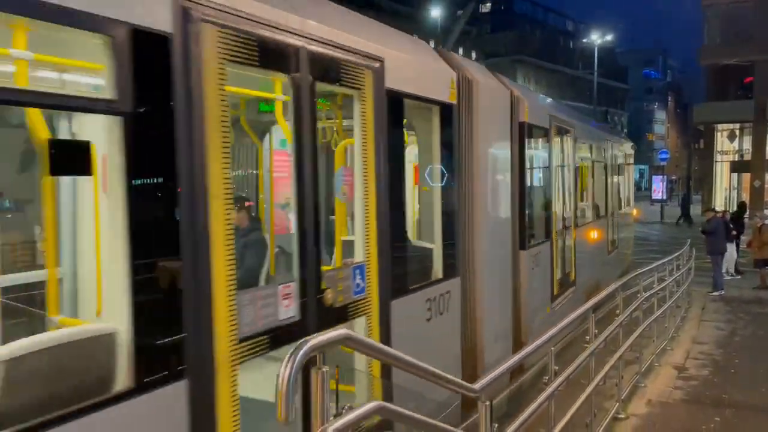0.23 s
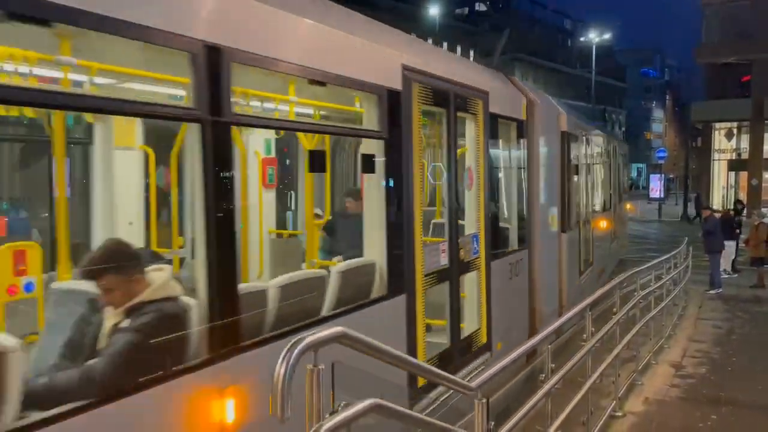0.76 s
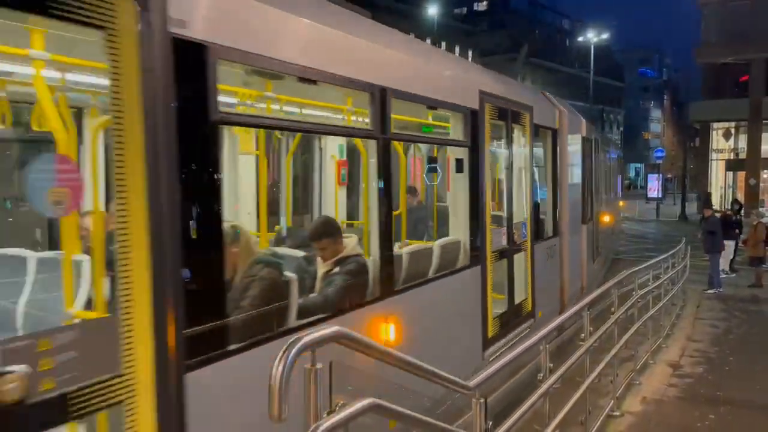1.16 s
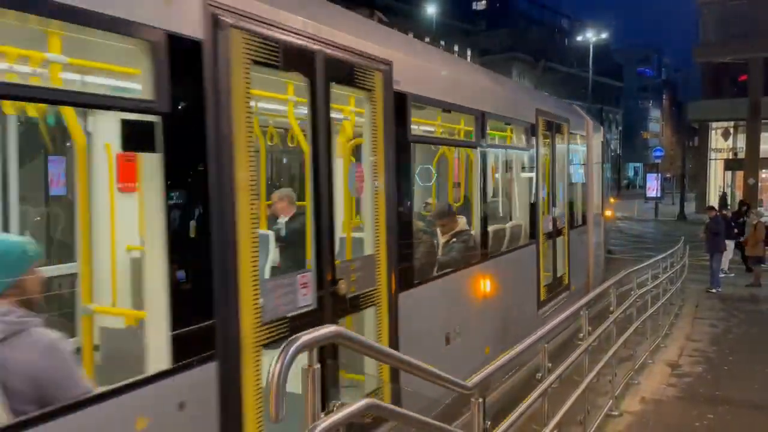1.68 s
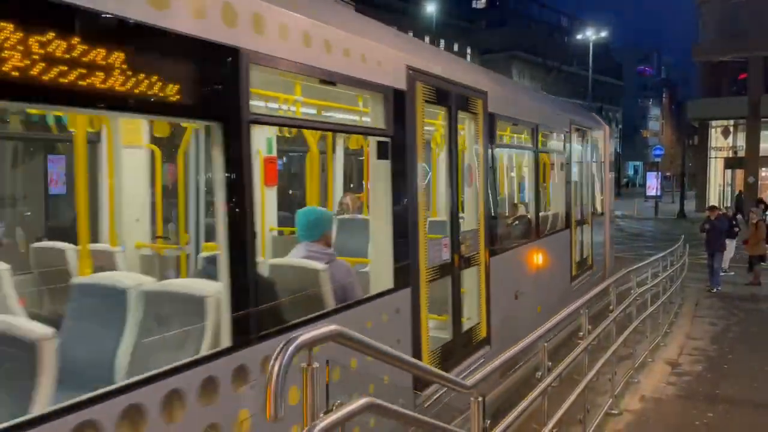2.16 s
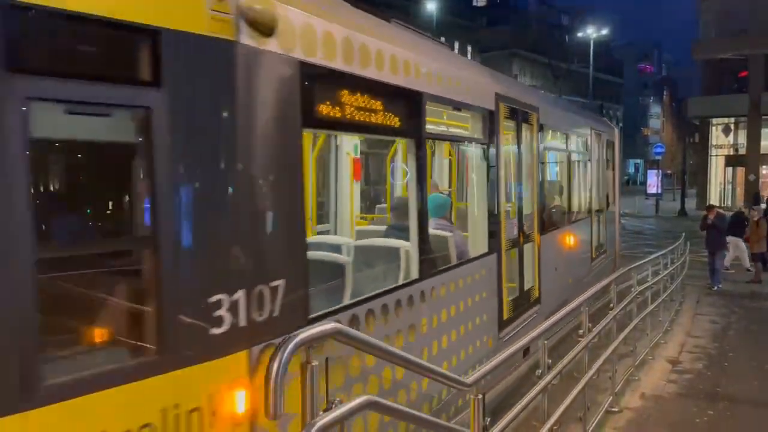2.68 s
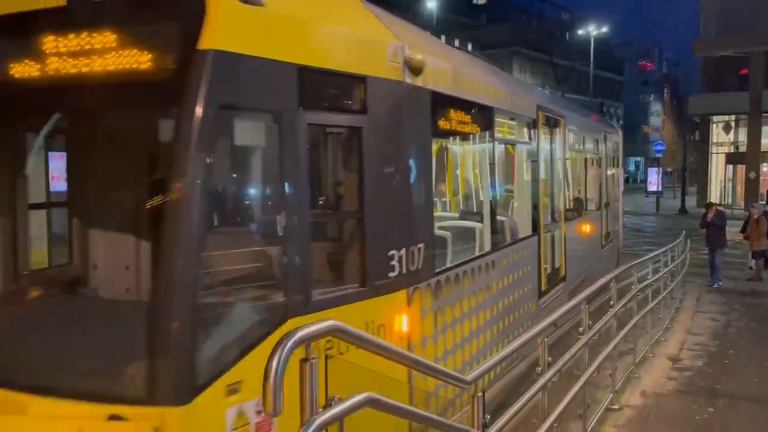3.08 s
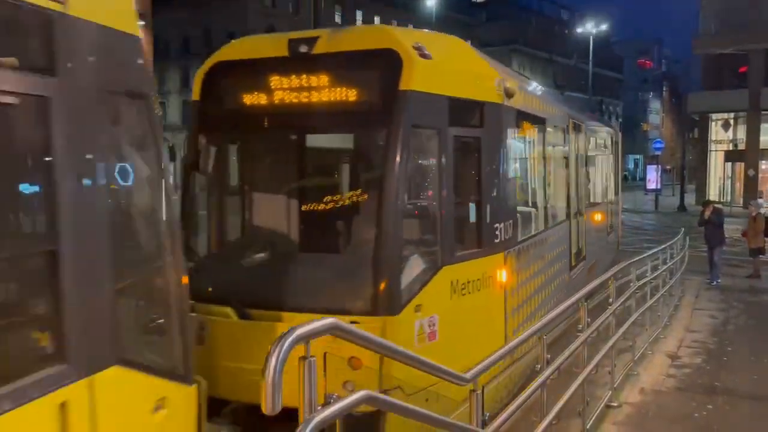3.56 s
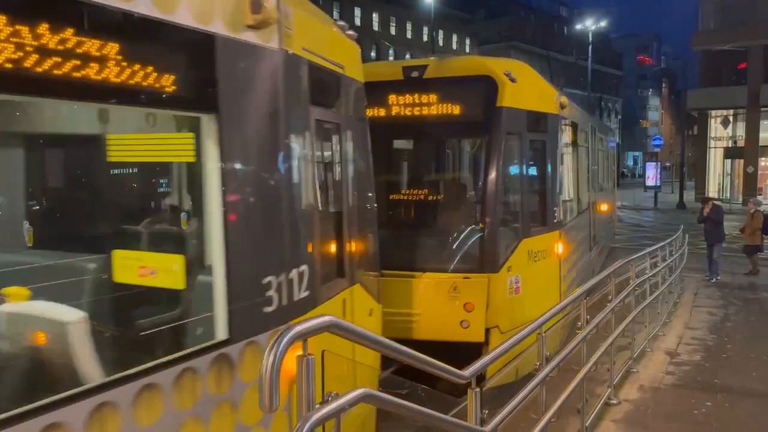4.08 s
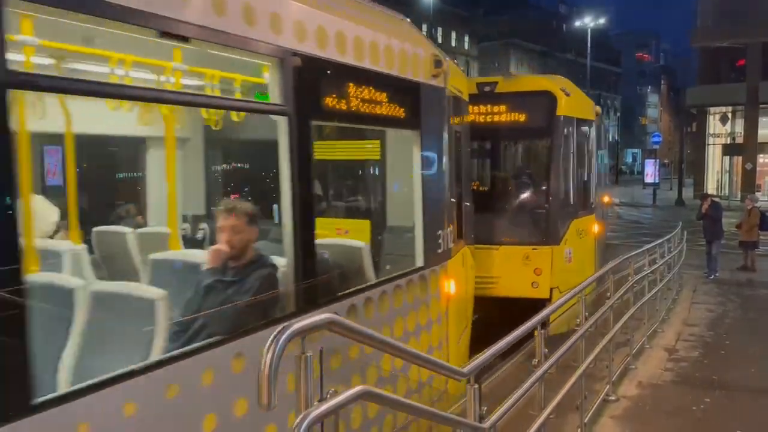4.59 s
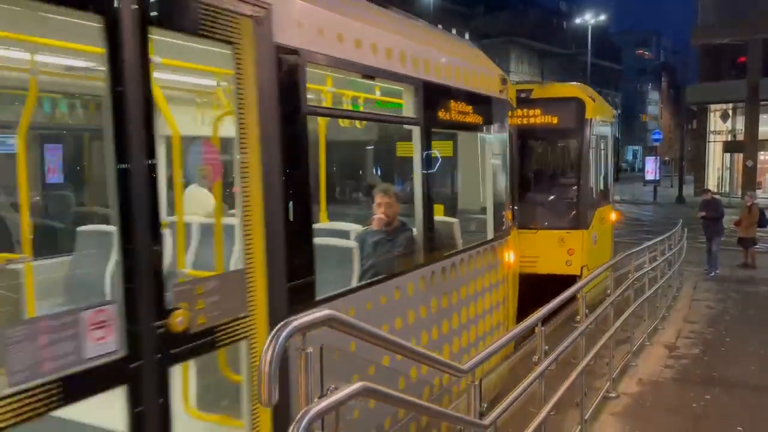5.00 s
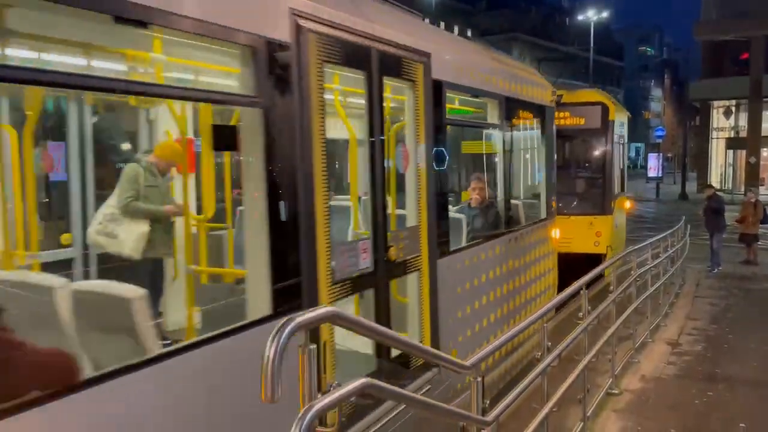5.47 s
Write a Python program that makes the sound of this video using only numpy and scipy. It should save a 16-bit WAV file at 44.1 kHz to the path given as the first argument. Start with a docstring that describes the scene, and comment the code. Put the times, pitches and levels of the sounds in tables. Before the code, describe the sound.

Coupled trams glide by at arm's length with a deep throbbing boom and rolling roar, then rattle, grind and squeak as the second car passes.

```python
"""Two trams gliding past

Two coupled trams glide past at a city stop, an arm's length away. The bodies boom near 70 Hz, a beating
low mode, over filtered-noise roar of wheels on rail. The rail sings in wavering modes and low hums come
and go. Rattles and thin flange whistles set in midway; then the second car's bogie arrives, and small
contacts make its steel grind. Short groans, squeaks and rasps come from the wheels."""
import sys
import numpy as np
from scipy import signal
from scipy.fft import rfft, irfft
from scipy.io import wavfile
from scipy.ndimage import map_coordinates

SR = 44100
rng = np.random.default_rng(int(sys.argv[2]) if len(sys.argv) > 2 else 0)


def to_wav(sig):
    """Store sig (one row per channel, or 1-D mono) as 16-bit WAV at the path in sys.argv[1].

    Samples outside -1..1 are clipped; the rate is SR.
    """
    pcm = np.clip(np.atleast_2d(sig), -1, 1) * 32767
    pcm = np.round(pcm).astype(np.int16)
    wavfile.write(sys.argv[1], SR, pcm.T)  # frames by channels


N = 253134
T = np.arange(N) / SR
FREQS = np.maximum(np.fft.rfftfreq(N, 1 / SR), 1)


def undb(db):
    """Decibels to gain."""
    return 10 ** (np.asarray(db) / 20)


def unit(x):
    """Scale to rms 1."""
    return x / np.sqrt(np.mean(x ** 2))


def curves(table):
    """Draw each column of a table as a line through time."""
    start_s, *columns = np.transpose(table)
    return [np.interp(T, start_s, column) for column in columns]


def during(table, fade_s=0.12):
    """1 while a table lasts, fading outside it."""
    inside_s = np.minimum(T - table[0][0], table[-1][0] - T)
    return np.clip(1 + inside_s / fade_s, 0, 1)


def swell(start, length):
    """A rounded rise to 1 and fall."""
    along = np.clip((T - start) / length, 0, 1)
    return 2 * np.sqrt(along * (1 - along))


def held(start, length, attack_s, release_s):
    """Attack, hold and an exponential release."""
    attack = np.clip((T - start) / attack_s, 0, 1)
    return attack * np.exp(-np.maximum(T - start - length, 0) / release_s)


def noise():
    """Unrelated white noise for mid and side."""
    return rng.standard_normal((2, N))


def response(points):
    """Gain at every frequency from (Hz, dB) points, joined on a log frequency axis."""
    hz, db = np.transpose(points)
    return undb(np.interp(np.log(FREQS), np.log(hz), db))


def resonance(hz, width_hz):
    """Band-pass response with gain 1 at the centre."""
    return 1 / (1 + 1j * (FREQS ** 2 - hz ** 2) / (FREQS * width_hz))


def filtered(x, gain):
    """Pass a sound through a frequency response."""
    return irfft(rfft(x) * gain, N)


def walk(rate):
    """Slow random wander with rms 1: 2 * rate random levels a second, joined smoothly."""
    levels = rng.standard_normal(2048)
    return unit(map_coordinates(levels, [T * rate * 2], order=2, mode="wrap"))


def tone(hz):
    """A clean partial on a moving pitch, a quarter cycle apart in mid and side."""
    phase = 2 * np.pi * np.cumsum(hz) / SR
    return np.sqrt(2) * np.array([np.sin(phase), np.cos(phase)])


def ring(hz, width_hz):
    """A mode kept ringing by friction: size and phase wander faster the wider it is; pitch may move."""
    steps = rng.standard_normal((4, 32768))
    place = [T * width_hz * 2]
    swing = np.array([map_coordinates(row, place, order=2, mode="wrap") for row in steps])
    phase = 2 * np.pi * np.cumsum(hz + 0 * T) / SR
    return unit(swing[:2] * np.cos(phase) + swing[2:] * np.sin(phase))


def drifting(x, share, rate):
    """Let the pitch of a sound wander by a small share, by playing it slightly early or late."""
    place = (T + share * walk(rate) / (np.pi * rate)) * SR
    return np.array([map_coordinates(row, [place], order=3, mode="mirror") for row in x])


# the body's boom, swelling as each car goes by, before lulls and thuds: start_s, level_db
BOOM_LEVEL = [(0, -16), (1.04, -18), (1.09, -13.5), (1.5, -10.5), (2.12, -10.5), (2.3, -12.5),
              (2.95, -11.5), (3.15, -20), (3.95, -15), (4.25, -10.5), (4.55, -11), (4.78, -15.5),
              (4.83, -23), (5.25, -20.5), (5.5, -15.5)]
# pitch of the boom: start_s, pitch_hz
BOOM_PITCH = [(0, 66.97), (0.95, 72.03), (1.5, 66.44), (2.8, 68.47), (4.4, 73.67), (5.74, 70.42)]
# moments when the boom dips: start_s, length_s
LULLS = [(0.119, 0.15), (0.482, 0.036), (0.835, 0.037), (1.688, 0.04), (2.153, 0.11), (2.469, 0.03),
         (3.572, 0.11), (3.875, 0.038), (4.15, 0.03), (4.944, 0.041), (5.252, 0.06)]
LULL_DB = -14
# thuds that kick the body into a wider swing: start_s, lift_db
THUDS = [(0.3, 2.5), (0.63, 5.5), (1.07, 4.5), (3.18, 10.5), (3.418, 8.5), (3.68, 6.5), (4.26, 3.5),
         (4.76, 8)]
THUD_RISE_S, THUD_DECAY_S = 0.015, 0.088


def boom(wander_hz=1.84, beat=0.26, beat_per_s=12, tone_db=-0.1, overtone_db=-22,
         shake_db=-12, shake_hz=65, shake_width_hz=32):
    """The body's low mode swings with a weak octave, beating unevenly as the track shakes it."""
    db = curves(BOOM_LEVEL)[0]
    for start, length in LULLS:
        db = db + LULL_DB * swell(start, length) ** 2
    for start, lift in THUDS:
        db = db + lift * held(start, THUD_RISE_S, THUD_RISE_S, THUD_DECAY_S)
    hz = curves(BOOM_PITCH)[0]
    phase = 2 * np.pi * np.cumsum(hz + wander_hz * walk(14.6)) / SR
    # a random push on the steady swing moves both its size and its phase
    pushed = 1 + beat * (walk(beat_per_s) + 1j * walk(beat_per_s))
    size = unit(np.abs(pushed))
    phase = phase + np.angle(pushed)
    swing = np.array([np.sin(phase), 0.39 * np.cos(phase)]) * size * undb(tone_db)
    octave = undb(overtone_db) * ring(2 * hz, 13.8)
    shake = undb(shake_db) * unit(filtered(noise(), resonance(shake_hz, shake_width_hz) ** 2))
    return undb(db) * (swing + octave + shake)


# spectrum of the rumble under the floor: frequency_hz, density_db (relative, per Hz)
RUMBLE_SPECTRUM = [(20, -37), (32, -43), (45, 0), (100, 2), (122, -3), (142, -15), (165, -11), (195, -7),
                   (300, -16), (420, -24.5), (900, -49)]
# spectrum of the track's roar: frequency_hz, density_db (relative, per Hz)
ROAR_SPECTRUM = [(200, 1.5), (380, 0.5), (470, 2), (620, 1), (710, 3), (830, 3.5), (1000, -3.5),
                 (1170, -10), (1600, -9), (1950, -17.5), (3000, -24), (6000, -38)]
# spectrum of the fine rolling hiss: frequency_hz, density_db (relative, per Hz)
HISS_SPECTRUM = [(900, 4), (2000, 7), (3200, 5.5), (4200, 0), (6500, -5), (8200, -2.5), (10000, -9),
                 (12000, -8.5), (13500, -43), (16000, -28)]
# rough patches of track, lifting rumble in full and roar and hiss in part: start_s, length_s, lift_db
PATCHES = [(0.084, 0.21, 2), (1.23, 0.39, 4), (1.61, 0.13, 3.5), (1.82, 0.23, 4), (2.35, 0.13, 2.5),
           (2.78, 0.28, 3.5), (4.202, 0.14, 2), (4.446, 0.56, 2), (5.174, 0.11, 1.5), (5.4, 0.097, 2),
           (5.666, 0.22, 4.5)]
# base levels under the first car, and their growth as the second draws near
RUMBLE_DB, ROAR_DB = -26.5, -34.5
SECOND_CAR_S, RUMBLE_RISE_DB_PER_S, ROAR_RISE_DB_PER_S = 3.43, 2, 1.38
# the gap between the cars: no bogie is near, and the track's roar comes through
GAP_S, GAP_LENGTH_S, GAP_RUMBLE_DB, GAP_ROAR_DB = 2.98, 0.75, -1, 2


def rolling(roar_share=0.65, hiss_db=-43, hiss_share=0.23, uneven_db=1.37, hiss_uneven_db=0.95):
    """Wheel and rail roughness: rumble under the floor, roar from the track, a fine hiss on top."""
    lift = sum(db * swell(start, length) ** 2 for start, length, db in PATCHES)
    nearing_s = np.maximum(T - SECOND_CAR_S, 0)
    gap = swell(GAP_S, GAP_LENGTH_S)
    rumble_db = RUMBLE_DB + RUMBLE_RISE_DB_PER_S * nearing_s + GAP_RUMBLE_DB * gap + lift
    roar_db = ROAR_DB + ROAR_RISE_DB_PER_S * nearing_s + GAP_ROAR_DB * gap + roar_share * lift
    roar_db = roar_db + uneven_db * walk(18)
    hiss_level_db = hiss_db + hiss_share * lift + hiss_uneven_db * walk(8.6)
    rumble = unit(filtered(noise(), response(RUMBLE_SPECTRUM))) * undb(rumble_db)
    roar = unit(filtered(noise(), response(ROAR_SPECTRUM))) * undb(roar_db)
    hiss = unit(filtered(noise(), response(HISS_SPECTRUM))) * undb(hiss_level_db)
    return rumble + roar + hiss


# modes of the bogie's steel: frequency_hz, width_hz, relative_db
BOGIE_MODES = [(1308, 43, 2.5), (1478, 15, 9), (1860, 18, 9.5), (2205, 370, 4.5), (2860, 160, 3),
               (3120, 42, 7), (3400, 66, -1), (3640, 42, 8.5), (3830, 33, 4.5), (3890, 45, -1),
               (4480, 40, 7), (4590, 46, 8.5), (4820, 50, 0), (5055, 37, 5), (5260, 54, -4),
               (5970, 90, -1.5), (6220, 73, -4.5), (6350, 77, -0.5), (6940, 70, -3)]
# broad spectrum of the steel under those modes: frequency_hz, relative_db
STEEL_SPECTRUM = [(600, -7), (1500, -24), (2100, -2), (2550, -16), (3400, -2.5), (4200, -2.5), (5000, -3.5),
                  (5500, -7), (7000, -14), (8600, -2.5), (10000, -18), (13000, -13), (16000, -24)]
# jolts that set loose parts chattering: start_s, peak_db (before the jolt trim)
JOLTS = [(2.5644, -28.5), (3.4637, -26), (3.7638, -30), (4.0027, -27.5), (4.2818, -40), (4.417, -36),
         (4.4641, -33), (4.6006, -24.5), (4.6589, -30), (4.69, -32), (4.7747, -24.5), (4.8744, -41),
         (5.1942, -29), (5.3783, -31), (5.497, -29), (5.5639, -34)]
# harder scrapes of the near bogie: start_s, length_s, level_db (at the start, before the grind trim)
SCRAPES = [(4.28, 0.025, -39), (4.41, 0.15, -35.5), (4.436, 0.05, -48), (4.596, 0.087, -35),
           (4.685, 0.055, -38), (4.782, 0.13, -36), (4.915, 0.04, -45), (5.093, 0.02, -46),
           (5.176, 0.026, -45), (5.258, 0.032, -45), (5.304, 0.18, -39), (5.477, 0.15, -37),
           (5.677, 0.1, -40.5)]
SCRAPE_ATTACK_S, SCRAPE_RELEASE_S, SCRAPE_SAG_DB_PER_S = 0.021, 0.037, 32
# the near bogie grinds lightly from its arrival on; level before trim
BOGIE_ARRIVES_S, GRIND_DB = 4.19, -41.5
# how the modes come and go: spread of level, rate, and drift as a share of pitch
FLARE_DB, FLARES_PER_S, MODE_DRIFT = 2.5, 7, 0.004


def bogie(grind_trim_db=-1, bite_db=0.56, jolt_trim_db=-13, jolt_decay_s=0.029, contacts_per_s=2200,
          scatter_db=1.5, modes_db=-2, clatter_per_s=36, clatter_decay_s=0.02, clatter=0.62):
    """Dense small contacts ring the steel; scrapes bite and ease, loose parts clatter, jolts burst in."""
    # slaps come at a wandering rate; each has its own strength, starts sharply and fades until the next
    slap_rate = clatter_per_s * undb(3 * walk(30))
    slap_number, slap_progress = np.divmod(np.cumsum(slap_rate) / SR, 1)
    strength = 2 * rng.random(N)[slap_number.astype(int)]
    slaps = strength * np.exp(-slap_progress / clatter_per_s / clatter_decay_s)

    grind = undb(GRIND_DB) * np.clip((T - BOGIE_ARRIVES_S) / SCRAPE_ATTACK_S, 0, 1)
    for start, length, db in SCRAPES:
        sagging_db = db - SCRAPE_SAG_DB_PER_S * np.maximum(T - start, 0)
        grind = grind + undb(sagging_db) * held(start, length, SCRAPE_ATTACK_S, SCRAPE_RELEASE_S)
    force = grind * undb(grind_trim_db + bite_db * walk(13)) * (0.63 + clatter * slaps)
    for start, db in JOLTS:
        burst = (T >= start) * np.exp(-np.abs(T - start) / jolt_decay_s)
        force = force + undb(db + jolt_trim_db) * burst

    sizes = undb(scatter_db * np.minimum(rng.exponential(size=N), 4))
    touching = rng.random(N) < contacts_per_s / SR
    contacts = force * unit(noise() * sizes * touching)
    # the point of contact shifts, so the modes flare one by one and drift in pitch
    scrape = rfft(force * noise())
    modes = [undb(modes_db + db) * resonance(hz, width) for hz, width, db in BOGIE_MODES]
    ringing = sum(irfft(scrape * mode, N) * undb(FLARE_DB * walk(FLARES_PER_S)) for mode in modes)
    steel = response(STEEL_SPECTRUM)
    overall = np.sqrt(np.mean(steel ** 2 + np.abs(sum(modes)) ** 2))
    return (filtered(contacts, steel) + drifting(ringing, MODE_DRIFT, FLARES_PER_S)) / overall


# hums of drives, body and wheels, each swelling and fading:
# start_s, length_s, pitch_hz, level_db, roughness (0 clean to 1 hoarse)
HUMS = [(0, 0.4, 215.6, -34, 0.15), (0.197, 0.42, 704, -43, .35), (0.296, 0.54, 204.8, -39, 0.4),
        (0.1, 1.56, 504.7, -48, .3), (0.72, 0.79, 264, -35, 0.25), (1.1, 0.74, 140.2, -30, 0),
        (1.197, 1.16, 986, -45.5, 0.37), (1.492, 3, 267.3, -44, 0.36), (2.366, 0.32, 143.3, -27.5, 0.33),
        (2.4, 2.5, 500, -45, 0.4), (2.7, 1.6, 350, -45.5, 0.43), (3.902, 1.04, 140.9, -29, 0.25),
        (4.143, 0.28, 583, -36.5, 0.2), (4.21, 0.22, 250, -31, 0.38), (4.236, 0.16, 310, -35, 0.3),
        (4.433, 0.092, 500, -35, 0.1), (4.495, 0.2, 583, -34, 0.2), (4.585, 0.62, 587.5, -38.5, 0.2),
        (4.7, 0.81, 203, -37.5, .25), (5.068, 0.15, 502, -35, 0.3), (5.126, 0.35, 141.5, -24.5, 0.23),
        (5.22, 0.1, 508, -28, 0.32), (4.31, 0.076, 493, -38.5, .3), (5.177, 0.42, 820, -38.5, 0.82),
        (5.42, 0.26, 339, -41, 0), (5.505, 0.56, 209.5, -25.5, 0.16), (5.626, 0.085, 511, -30, .25)]
# thin whine of the traction electronics: start_s, level_db
WHINE_LEVEL = [(0, -56), (1.2, -53), (2.5, -59), (4, -67), (5.74, -57)]


def hums(waver=0.00402, flutter_db=0.54, rough_width_hz=32, whine_hz=14960, whine_width_hz=110):
    """Low hums, part clean and part hoarse, come and go; the traction electronics whine far above."""
    out = ring(whine_hz, whine_width_hz) * undb(curves(WHINE_LEVEL)[0])
    for start, length, hz, db, rough in HUMS:
        rough = np.clip(rough, 0, 1)
        clean = np.sqrt(1 - rough ** 2) * tone(hz * (1 + waver * walk(10.6)))
        hoarse = rough * ring(hz, rough_width_hz)
        level = undb(db + flutter_db * walk(12))
        out = out + (clean + hoarse) * swell(start, length) ** 1.1 * level
    return out


# rail singing under the first car: start_s, level_db (before trim and surges), pitch_hz
SINGING = [(0, -43.5, 1452), (0.2, -45, 1430), (0.36, -48, 1404), (0.5, -47, 1419), (0.6, -45, 1453),
           (0.77, -43, 1476), (0.95, -44.5, 1458), (1.12, -46, 1467), (1.22, -45.5, 1460),
           (1.38, -44.5, 1473), (1.6, -46, 1488), (1.78, -43.5, 1470), (2.05, -48.5, 1497),
           (2.45, -49, 1498), (3.1, -53, 1518)]
# modes of the rail: pitch_ratio (multiple of the singing pitch), width_hz, relative_db
RAIL_MODES = [(1, 50, -6), (.84, 24, -10), (.92, 22, -5.5), (1.088, 20, -4), (1.51, 33, -12.5),
              (1.59, 18, -6), (1.67, 22, -8.5), (1.76, 26, -17), (1.98, 26, -18), (2.2, 70, -16)]
# surges of the singing core, half as many dB in the modes: start_s, length_s, lift_db
SURGES = [(0.442, 0.11, 5), (0.623, 0.062, 8), (0.724, 0.069, 5.5), (0.907, 0.082, 11.5), (0.987, 0.053, 5),
          (1.183, 0.08, 12), (1.277, 0.12, 2.5)]


def rail(trim_db=-2, flutter_db=2.8, waver=0.006, mode_flutter_db=1.5):
    """Narrow rail modes flare one by one round a clear wavering core, surge and die as the car leaves."""
    db, hz = curves(SINGING)
    surge_db = sum(lift * swell(start, length) ** 2 for start, length, lift in SURGES)
    hz = hz * (1 + waver * walk(12))
    modes = 0
    for ratio, width, mode_db in RAIL_MODES:
        modes = modes + undb(mode_db + mode_flutter_db * walk(4.99)) * ring(hz * ratio, width)
    core = undb(flutter_db * walk(8.2)) * tone(hz)
    singing = modes * undb(surge_db / 2) + core * undb(surge_db)
    return singing * undb(db + trim_db) * during(SINGING)


# short swells of the wheels' low mode: start_s, length_s, level_db (before the tone and ring trims)
GROANS = [(0, 0.071, -33), (0.27, 0.18, -36), (0.51, 0.18, -40), (1.4, 0.11, -39), (1.684, 0.065, -45),
          (2.348, 0.12, -34.5), (5.626, 0.12, -33)]
GROAN_HZ, GROAN_WIDTH_HZ = 821, 51


def groans(waver=0.01033, pure_db=-3, hoarse_db=-3):
    """Rough track briefly feeds the wheels' low mode: a firm tone in a hoarse ring, wandering in pitch."""
    size = sum(undb(db) * swell(start, length) ** 2 for start, length, db in GROANS)
    hz = GROAN_HZ * (1 + waver * walk(6))
    return size * (undb(pure_db) * tone(hz) + undb(hoarse_db) * ring(hz, GROAN_WIDTH_HZ))


# short squeaks and rasps of the wheels: start_s, length_s, pitch_hz, width_hz, level_db
SQUEAKS = [(0.434, 0.024, 4100, 399, -43), (1.15, 0.076, 10020, 120.6, -51), (1.175, 0.11, 5160, 1104, -49),
           (1.441, 0.12, 3670, 908, -48), (1.453, 0.096, 5300, 261, -46.5), (1.465, 0.069, 4960, 200, -50),
           (1.82, 0.29, 4970, 2580, -49), (3.33, 0.072, 5150, 110, -54), (4.752, 0.21, 2236, 139.8, -42),
           (4.76, 0.12, 8580, 151.3, -29.5), (4.63, 0.1, 1850, 24.92, -41), (4.78, 0.09, 5040, 70, -41.5),
           (4.985, 0.13, 4530, 45.1, -50), (5.095, 0.16, 4550, 45, -45), (5.202, 0.043, 1294, 300, -33),
           (5.55, 0.04, 9800, 90, -35), (5.614, 0.2, 1352, 800, -33.5)]


def squeaks():
    """A slipping wheel briefly feeds one mode: narrow ones squeak, wide ones rasp."""
    out = 0
    for start, length, hz, width, db in SQUEAKS:
        out = out + ring(hz, width) * swell(start, length) ** 2 * undb(db)
    return out


# wheel modes in the whistle: frequency_hz, width_hz, relative_db
WHEEL_MODES = [(5140, 70, -7.5), (8230, 110, -10), (9870, 100, -0.5), (13210, 70, -6.5), (14230, 80, -11),
               (15630, 80, -12)]
# spectrum of the flange sizzle: frequency_hz, relative_db
SIZZLE_SPECTRUM = [(3000, -32), (6000, -2), (10000, 12), (13000, 1), (16000, -17)]
# flanges rubbing the rail: start_s, length_s, whistle_db, sizzle_db (both before trim)
RUBS = [(2.567, 0.055, -54, -52), (2.682, 0.2, -52.5, -51.5), (2.901, 0.097, -60, -61),
        (3.183, 0.06, -54, -60), (3.339, 0.05, -52, -54), (3.456, 0.09, -47.5, -52),
        (3.56, 0.048, -50, -56), (3.751, 0.029, -46, -63), (3.838, 0.22, -51, -58), (4.187, 0.2, -53, -54),
        (4.397, 0.53, -51, -51), (4.96, 0.1, -58, -68), (5.19, 0.54, -54, -50.5)]
RUB_ATTACK_S, RUB_RELEASE_S = 0.008, 0.034


def flanges(whistle_trim_db=-2, sizzle_trim_db=1.5, catch_db=3.0, sizzle_catch_db=2):
    """Flanges catch and slip on the rail, sizzling and ringing the wheels' high modes."""
    whistle = sizzle = 0
    for start, length, whistle_db, sizzle_db in RUBS:
        contact = held(start, length, RUB_ATTACK_S, RUB_RELEASE_S)
        whistle = whistle + contact * undb(whistle_db)
        sizzle = sizzle + contact * undb(sizzle_db)
    # one wandering grip moves whistle and sizzle together
    grip = walk(25)
    modes = sum(undb(db) * ring(hz, width) for hz, width, db in WHEEL_MODES)
    rub = unit(filtered(noise(), response(SIZZLE_SPECTRUM)))
    whistling = modes * whistle * undb(whistle_trim_db + catch_db * grip)
    sizzling = rub * sizzle * undb(sizzle_trim_db + sizzle_catch_db * grip)
    return whistling + sizzling


def scene():
    """All sources as mid and side, turned into left and right."""
    body_and_track = boom() + rolling()
    machinery = bogie() + hums()
    wheels_and_rail = rail() + groans() + squeaks() + flanges()
    mid, side = body_and_track + machinery + wheels_and_rail
    return np.array([mid + side, mid - side])


# tone of the mid (what left and right share), nearly empty near 8 kHz and from 14 kHz:
# frequency_hz, gain_db
MID_GAIN = [(6900, 0), (7500, -8), (8000, -42), (8350, -35), (8700, -16), (9400, -4.5), (13200, -9),
            (14000, -48), (15000, -57)]
# tone of the side (what differs between left and right), thin in the bass and near 11.4 kHz:
# frequency_hz, gain_db
SIDE_GAIN = [(60, -18), (125, -25.5), (250, -11), (500, -7.5), (1100, -3), (2000, -4.5), (6200, -6.5),
             (7100, -1), (8400, -4), (10000, -4.5), (11400, -35), (13200, -13), (15000, 1)]
# balance of left and right: frequency_hz, left_minus_right_db
LEFT_LEAD = [(60, -1), (110, -2.5), (200, -1), (360, 0.5), (650, 0.5), (1190, 0), (2160, -0.5), (3930, 4),
             (7140, 0.5), (13000, -2)]
TOP_HZ = 15800


def record(dry):
    """Shape the tone of mid and side, tip the balance and cut the top."""
    left, right = dry
    mid = filtered((left + right) / 2, response(MID_GAIN))
    side = filtered((left - right) / 2, response(SIDE_GAIN))
    # half the lead goes to the left, half comes off the right
    lean = np.sqrt(response(LEFT_LEAD))
    stereo = np.array([filtered(mid + side, lean), filtered(mid - side, 1 / lean)])
    low_pass = signal.ellip(10, .2, 80, TOP_HZ, fs=SR, output="sos")
    return signal.sosfilt(low_pass, stereo)


dry = scene()
out = record(dry)
to_wav(out)
```